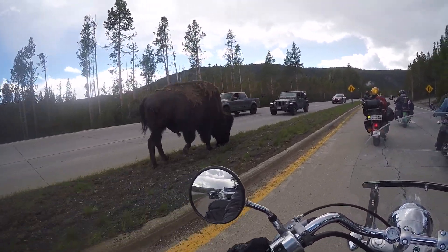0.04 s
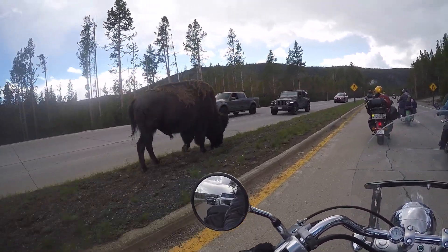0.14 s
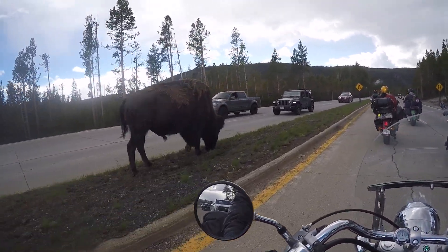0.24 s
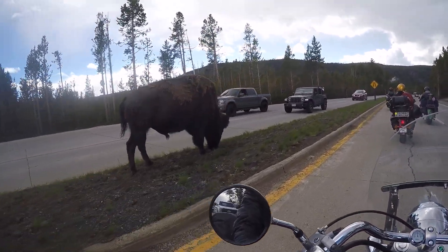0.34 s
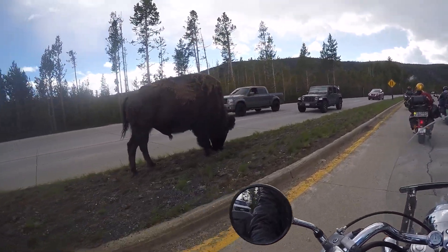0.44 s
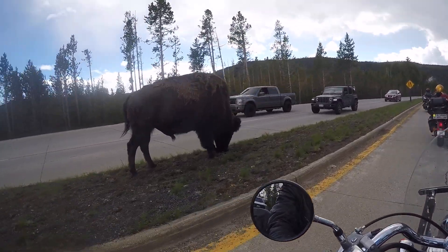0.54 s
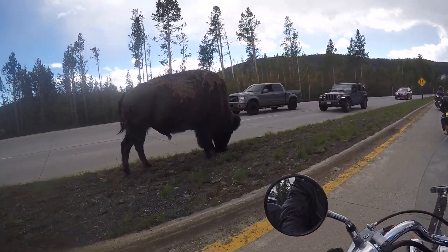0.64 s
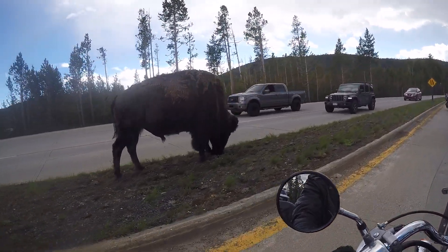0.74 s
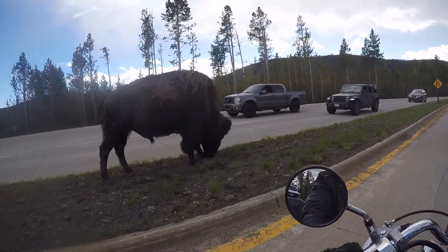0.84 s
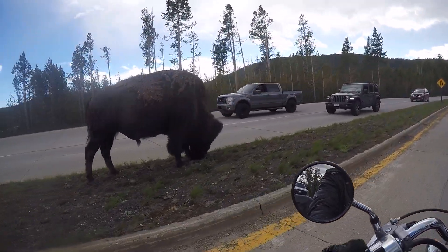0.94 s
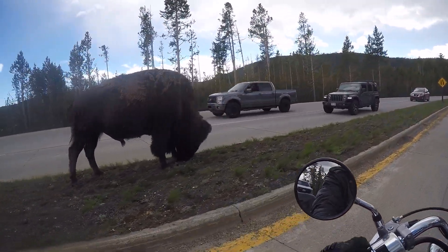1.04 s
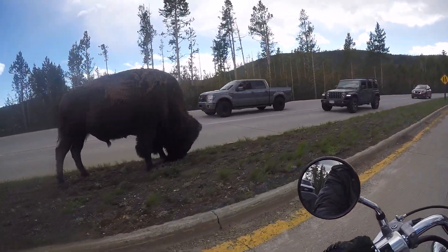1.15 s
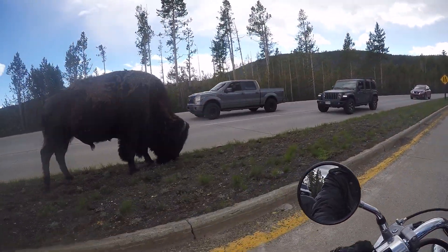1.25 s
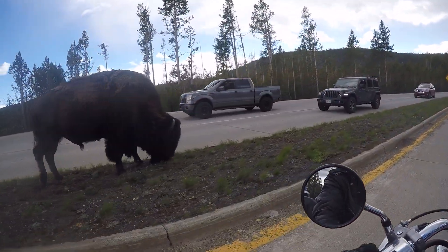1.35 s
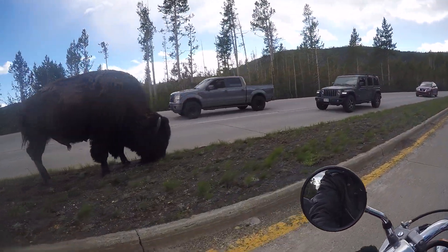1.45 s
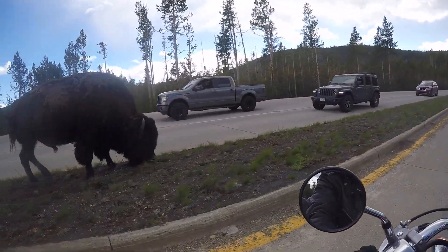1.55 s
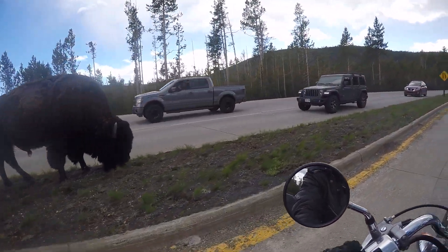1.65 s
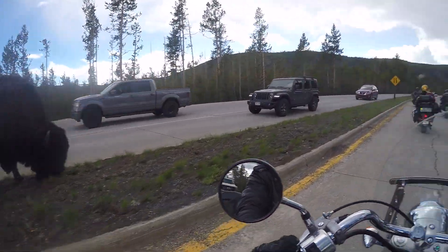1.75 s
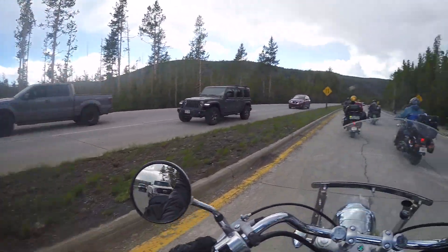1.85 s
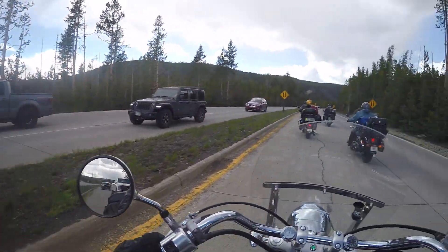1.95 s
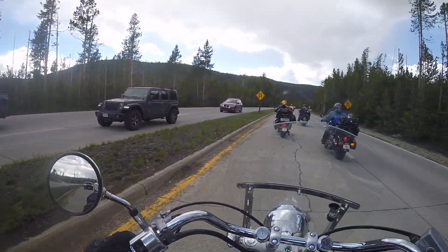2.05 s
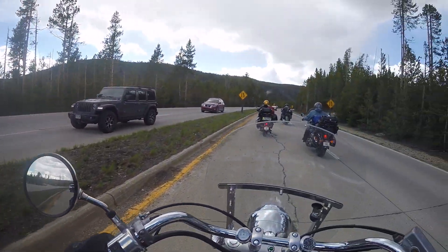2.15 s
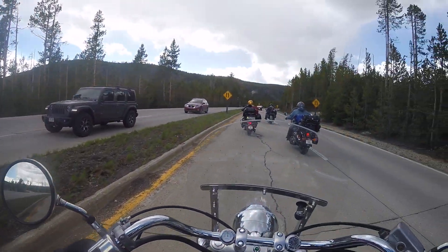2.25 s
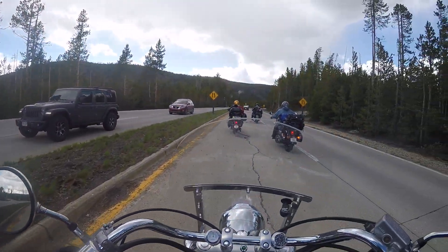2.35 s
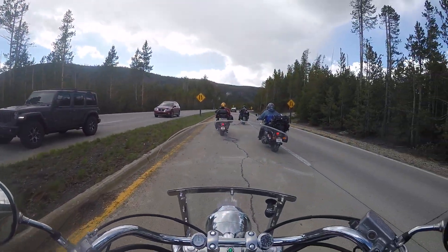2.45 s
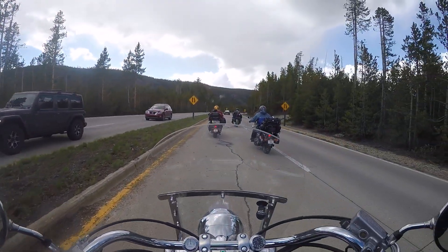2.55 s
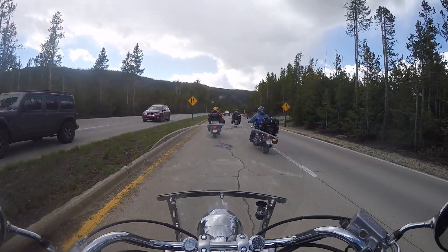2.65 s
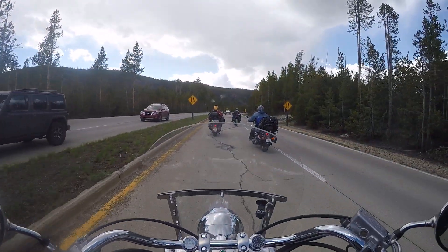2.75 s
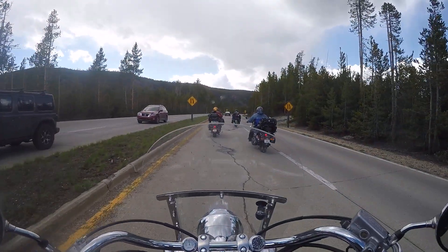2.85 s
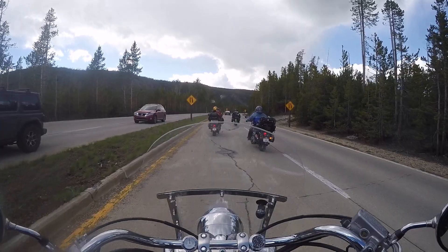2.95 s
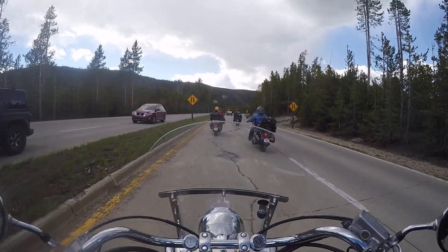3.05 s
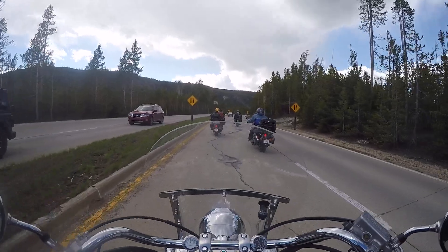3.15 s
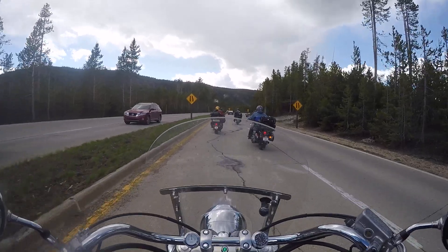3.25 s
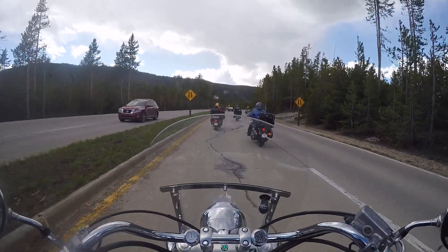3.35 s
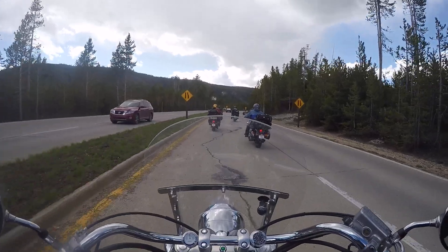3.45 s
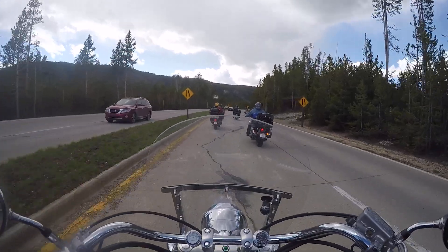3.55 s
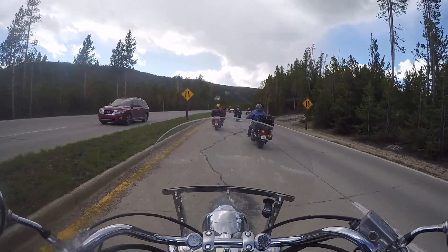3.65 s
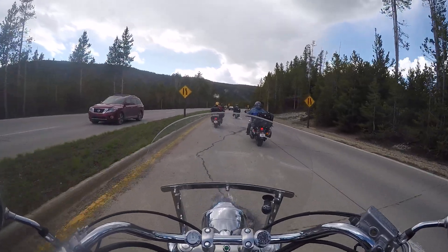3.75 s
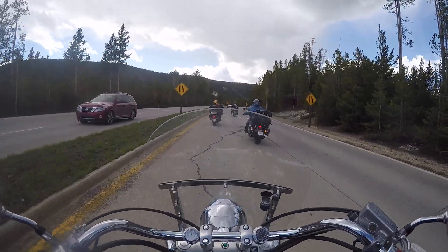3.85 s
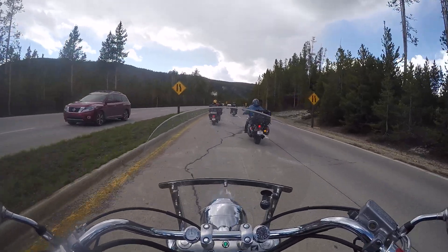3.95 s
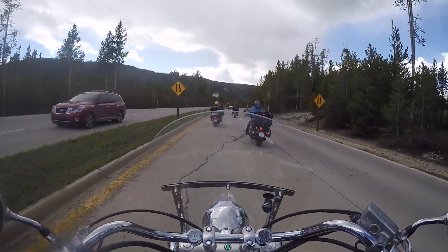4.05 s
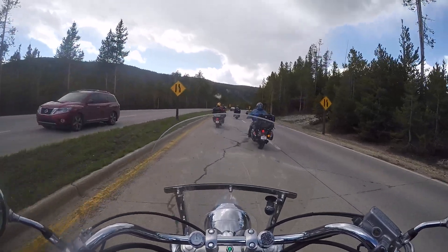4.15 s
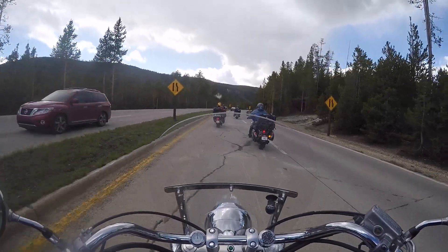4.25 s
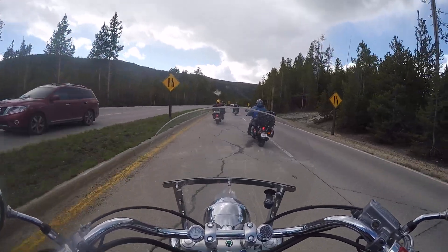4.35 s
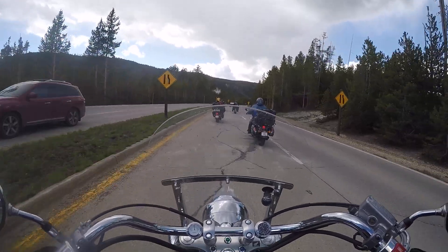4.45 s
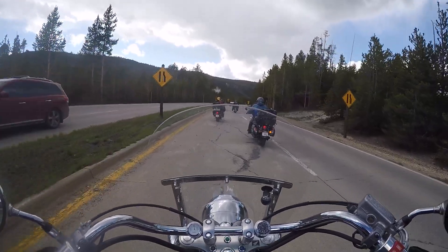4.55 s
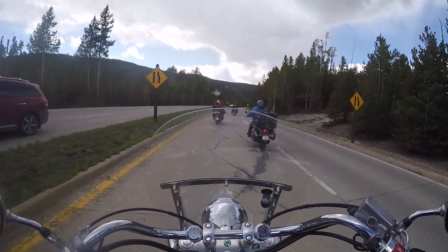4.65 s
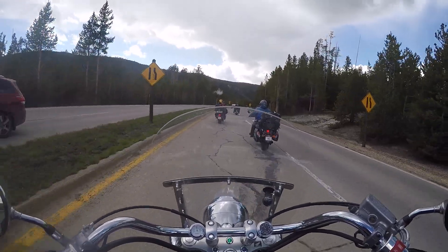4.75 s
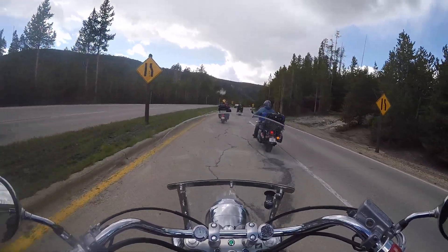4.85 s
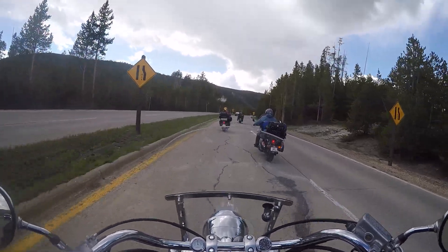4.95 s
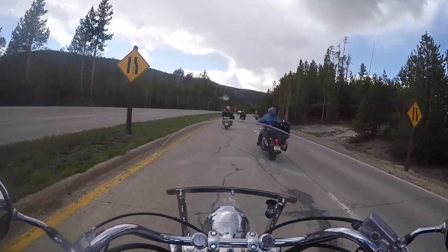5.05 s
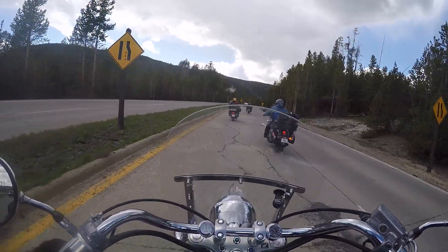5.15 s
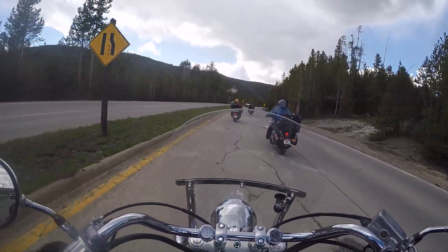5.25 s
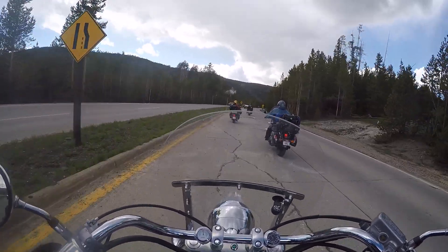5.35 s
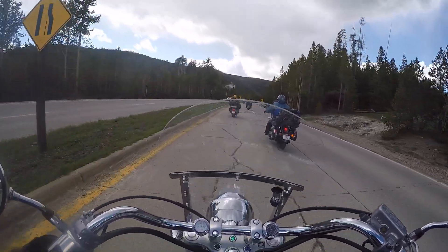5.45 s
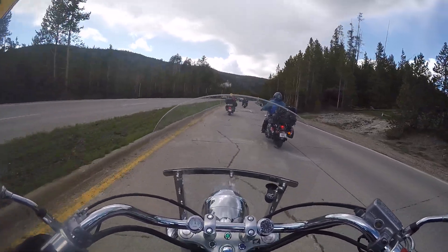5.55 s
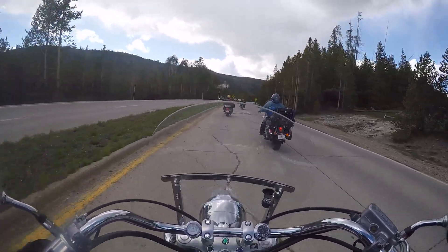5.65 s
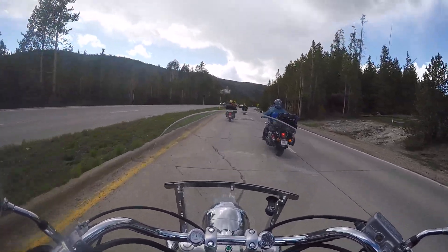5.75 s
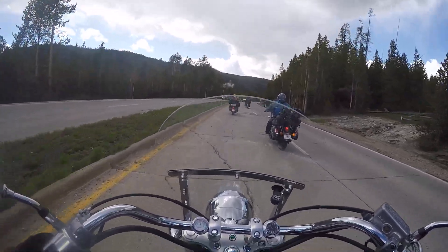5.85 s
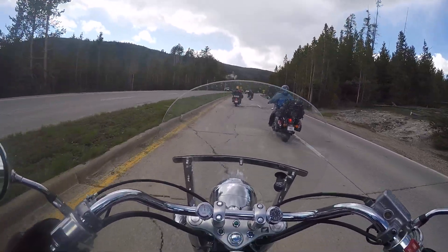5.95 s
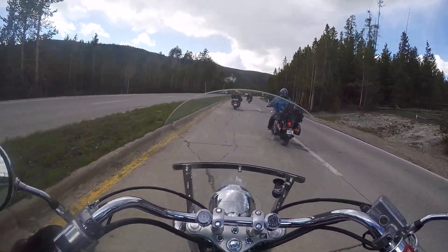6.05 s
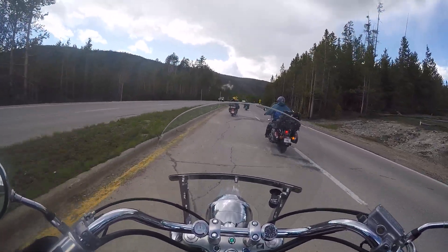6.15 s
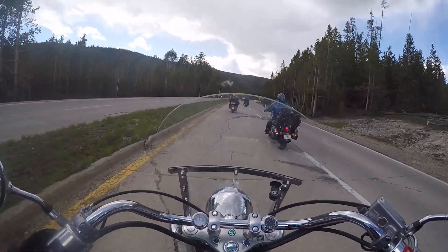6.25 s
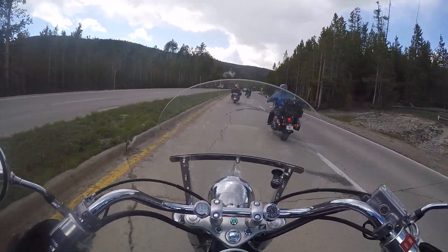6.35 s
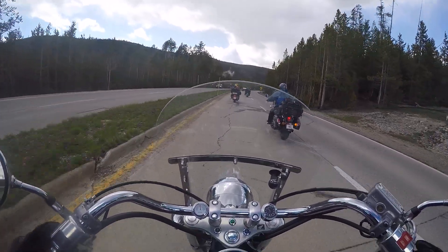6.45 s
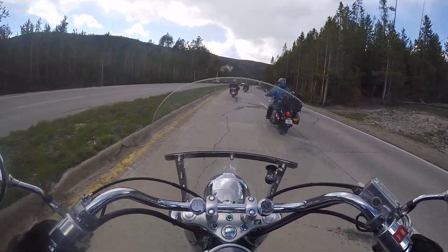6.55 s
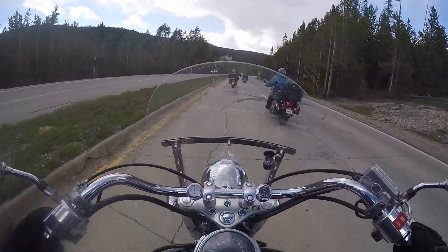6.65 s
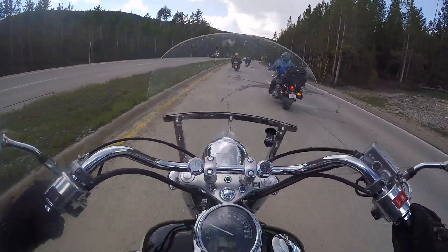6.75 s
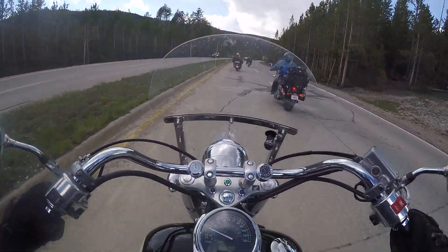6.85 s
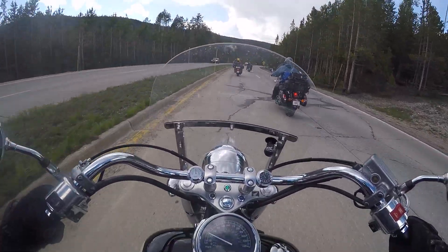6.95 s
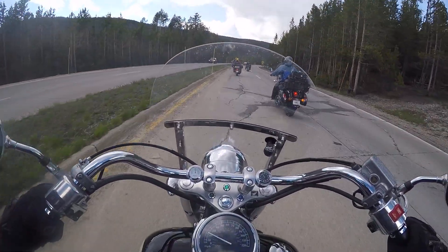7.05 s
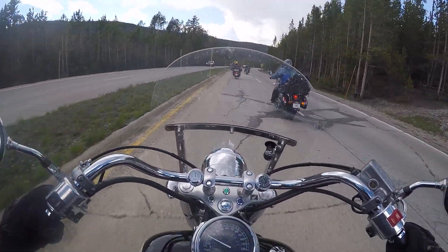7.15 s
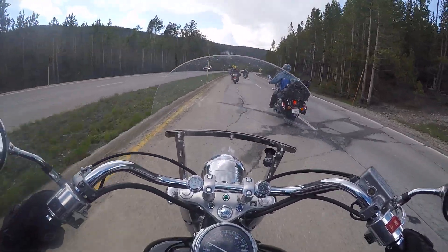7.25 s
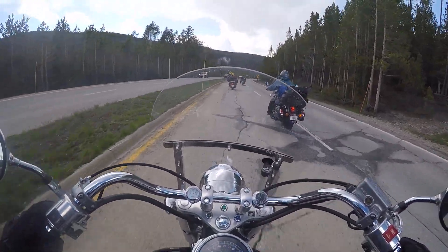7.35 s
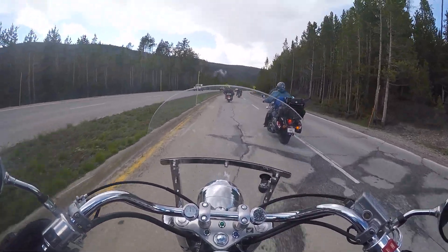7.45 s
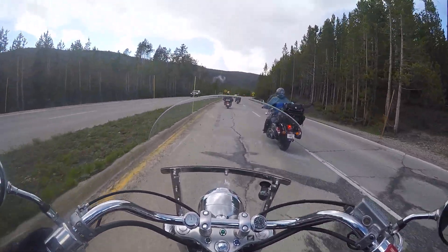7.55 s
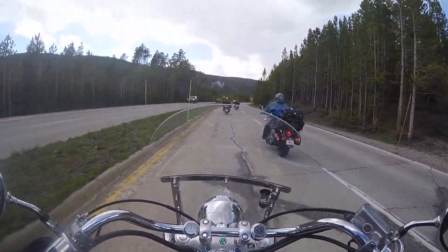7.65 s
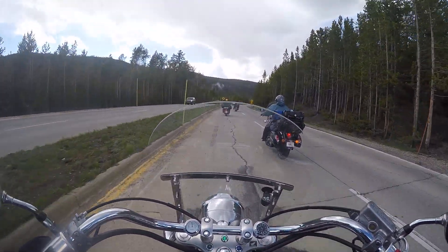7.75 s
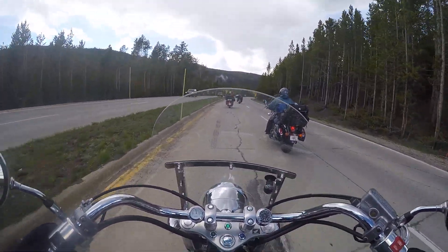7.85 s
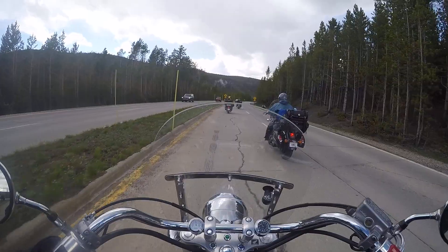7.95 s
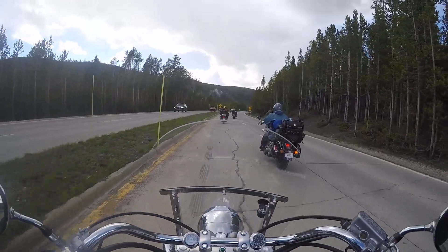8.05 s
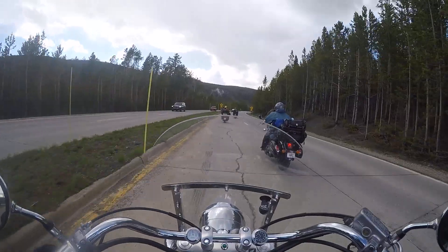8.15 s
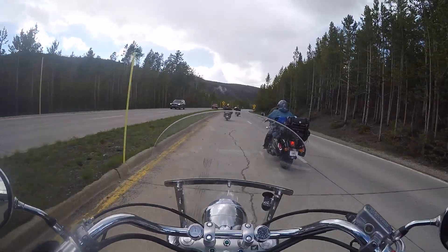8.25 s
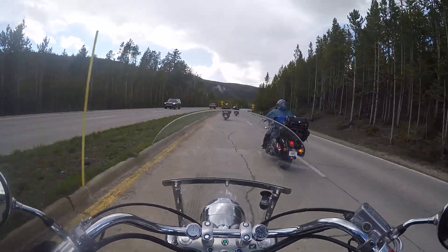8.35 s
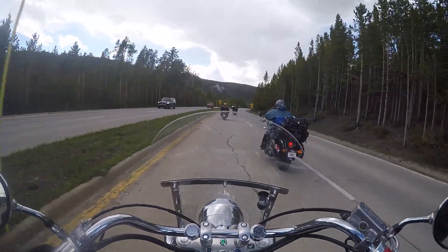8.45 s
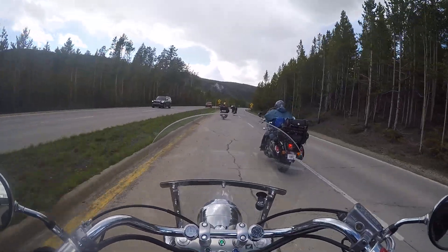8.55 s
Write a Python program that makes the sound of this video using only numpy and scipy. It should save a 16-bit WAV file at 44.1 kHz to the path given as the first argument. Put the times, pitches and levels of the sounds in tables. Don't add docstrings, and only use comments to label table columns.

```python
import sys
import numpy as np
from scipy import signal
from scipy.io import wavfile
from scipy.ndimage import uniform_filter1d

SR = 44100
rng = np.random.default_rng(int(sys.argv[2]) if len(sys.argv) > 2 else 0)


def dump_mix(stems):
    frames = np.atleast_2d(stems).T
    limited = np.clip(frames, -1, 1)
    pcm = np.round(limited * 32767).astype(np.int16)
    wavfile.write(sys.argv[1], SR, pcm)


def level_to_linear(level):
    exponent = np.asarray(level, float) / 20
    return 10 ** exponent


N = 379701

# time in seconds, four-stroke cycles per second.
RASPY_SPEED = [(0.0, 11.336), (1.0, 11.417), (2.0, 15.65), (2.25, 19.513), (2.75, 17.309), (3.0, 15.127),
               (3.25, 16.139), (4.0, 21.662), (4.87, 26.877), (5.1, 19.918), (5.25, 17.468), (5.75, 17.164),
               (8.61, 23.726)]
TICKING_SPEED = [
    (0.0, 11.042),
    (0.5, 10.279),
    (0.75, 10.649),
    (1.25, 12.398),
    (3.0, 16.733),
    (4.5, 22.165),
    (6.37, 29.568),
    (6.75, 19.89),
    (7.0, 19.062),
    (8.61, 22.275),
]
FAR_SPEED = [
    (0.0, 11.105),
    (1.2, 11.69),
    (1.5, 14.309),
    (1.8, 14.12),
    (2.1, 11.13),
    (2.25, 10.369),
    (4.5, 13.097),
    (4.9, 13.2),
    (5.7, 15.292),
    (8.61, 16.494),
]
# time in seconds, level in dB.
RASPY_LOAD = [(0, -52.5), (1.7, -39), (2.0, -39.5), (2.3, -33.5), (2.8, -26.5), (4.0, -25), (4.5, -28),
              (4.87, -28), (4.93, -43), (5.3, -47.5), (5.9, -28.5), (6.8, -26.5), (8.0, -28.5), (8.45, -29),
              (8.61, -37.5)]
TICKING_LOAD = [(0, -50), (1.0, -45.5), (1.5, -46), (2.6, -37), (4.4, -34.5), (5.2, -30.5), (5.7, -34.5),
                (6.38, -31), (6.42, -62), (6.8, -61), (6.95, -35), (7.75, -30), (8.61, -28)]
FAR_LOAD = [(0, -44), (1.15, -43.5), (1.251, -41), (1.5, -33.5), (1.68, -42), (1.8, -37.5), (2.2, -40),
            (2.6, -42), (4.5, -31.5), (4.9, -34.5), (6.098, -35), (8.61, -61)]
# time in seconds, tilt in dB per octave above 5 kHz.
RASPY_BRIGHT = [(0, -2), (4.9, -7), (5.9, 11), (8.61, -1)]
TICKING_BRIGHT = [(0, 2.5), (4.4, 1), (5.2, 2), (5.8, -0.5), (6.4, 8), (7.0, 8), (8.61, -1)]
FAR_BRIGHT = [(0, 0.1), (2.3, -.6), (4.7, -0.0044), (8.61, 0.1)]
# centre in Hz, width in Hz, first cylinder in dB, second cylinder in dB.
RASPY_PIPE = [(44.4, 12.4, -8, -14), (104.8, 37.5, -1, 2), (141.2, 38.6, -20.5, 0),
              (233.7, 25.6, -20, -7.5), (328, 67, -37, -34.5), (400.7, 31, -29.5, -24.5),
              (484, 63, -25.5, -22.5)]
TICKING_PIPE = [(114.3, 30, 7.5, 8), (144.4, 56, -5, -5.5), (241, 31, -5.5, -4), (273, 68, 0.5, 7),
                (413.4, 76, -4.5, -2), (529, 160, -10.5, -28), (726, 27, -24, -13), (907, 59, -12, -21.5)]
FAR_PIPE = [(61, 12, 3, 12), (98.8, 49, 12, 9.5), (150, 72, -27, -14), (213.4, 29.4, 0.5, 3),
            (262, 220, -24, -33), (368, 70, -23.5, -18)]
# centre in Hz, width in Hz, first cylinder in dB, second cylinder in dB.
RASPY_GAS = [(930, 300, -9, -12.5), (1364, 290, -6, -4.5), (1800, 410, 3, 4), (2334, 416, 9.5, 6.5),
             (2860, 680, 11, 3.5), (3695, 320, 2.5, -2), (4200, 3240, 4.5, 2.5), (7000, 1400, -40, -34),
             (9300, 4600, -20, -25), (12500, 4600, -60, -74)]
TICKING_GAS = [(954, 990, -6, -3), (1636, 490, -9, 0), (2520, 200, -3, 8.5), (4204, 1620, 10, 12),
               (5244, 740, 7, 10.5), (6200, 420, -6.5, -1), (8130, 600, -9, -1.5), (9000, 1500, -5.5, 2),
               (12450, 1400, -13, -6.5), (15200, 1600, -16, -9.5)]
FAR_GAS = [(1680, 760, -2.5, -5.5), (2490, 570, 7.5, 7), (3110, 650, -3, 4), (4440, 2100, 0.5, 0.5),
           (5700, 640, -23, -15), (8300, 970, -14, -14), (11500, 5400, -31, -14)]
# frequency in Hz, level in dB.
ROAR = [(45, -8), (100, 0), (170, -2), (250, -10), (350, -18), (500, -21), (620, -22)]
# frequency in Hz, level in dB per Hz.
HISS = [(740, -12), (1250, 1.5), (1670, 4.5), (2040, 1), (2500, 9.5), (3300, -4.5), (3870, -2),
        (5390, -9.5), (6000, -7), (8800, -26.5), (10600, -26), (14500, -22), (16000, -50)]
# time in seconds, peak in dB.
GUSTS = [(0.219, -31), (1.111, -32), (1.923, -12.5), (2.265, -20), (3.252, -20.5), (3.547, -6.5),
         (3.948, -17), (4.538, -25), (4.95, -7.5), (5.182, -15), (5.366, -15.5), (5.984, -31), (6.196, -26),
         (6.455, -8), (6.661, -20), (6.817, -9), (7.381, -7), (7.698, -8.5), (7.97, -18), (8.325, -23)]
# time in seconds, peak in dB.
IDLE_TICKS = [(0.162, -44), (0.2214, -46), (0.2823, -47), (0.307, -29), (0.3431, -45), (0.3681, -25.5),
              (0.4045, -46), (0.4666, -41), (0.5226, -28), (0.592, -29), (0.6963, -39), (0.7397, -34)]
# centre in Hz, width in Hz, depth as a share removed (negative lifts).
HOUSING = [
    (1190, 144, 0.51),
    (1715, 80, -1.38),
    (2250, 960, 0.3),
    (5950, 900, 0.42),
]


def rms_one(x):
    return x / np.sqrt(np.mean(x ** 2) + 1e-20)


def in_time(rows):
    seconds, *columns = np.transpose(rows)
    return [np.interp(np.arange(N) / SR, seconds, column) for column in columns]


def resonate(x, hz, width_hz):
    r = np.exp(-np.pi * width_hz / SR)
    top = np.array([1, 0, -1]) * (1 - r * r) / 2
    ring = [1, -2 * r * np.cos(2 * np.pi * hz / SR), r * r]
    return signal.lfilter(top, ring, x + 1e-18)


def resonate_twice(x, hz, width_hz):
    return resonate(resonate(x, hz, width_hz), hz, width_hz)


def smear(x, seconds):
    return signal.lfilter([1], [1, -np.exp(-1 / (max(seconds, 1e-5) * SR))], x + 1e-18)


def drift(rate):
    wander = smear(smear(rng.standard_normal(N + SR), 0.18 / rate), 0.18 / rate)
    return rms_one(wander[SR:])


def under_way(levels, middle_s=1.9, rise_s=0.29):
    pace = 1 / (1 + np.exp((middle_s - np.arange(N) / SR) / rise_s))
    return levels[0] + (levels[1] - levels[0]) * pace


def banded_noise(spectrum, patchy_db, count):
    hz, level_db = np.transpose(spectrum)
    edges = np.geomspace(hz[0], hz[-1], count + 1)
    white, flicker, out = rng.standard_normal((2, N)), drift(16.5), 0
    for k, (low, high) in enumerate(zip(edges, edges[1:])):
        band_pass = signal.butter(2, [low, high], "band", fs=SR, output="sos")
        band = signal.sosfilt(band_pass, white[k % 2])
        band_db = np.interp(np.log(low * high) / 2, np.log(hz), level_db)
        out = out + band * level_to_linear(band_db + patchy_db * np.roll(flicker, k * N // count))
    return rms_one(out)


def tyre_roar():
    roar = level_to_linear(under_way((-37.5, -29.5))) * banded_noise(ROAR, patchy_db=-4.0, count=8)
    return signal.sosfilt(signal.butter(6, 640, fs=SR, output="sos"), roar)


def air_hiss():
    throttle_share = 0.14
    hiss_db = under_way((-44.5, -35.5)) + throttle_share * (in_time(RASPY_LOAD)[0] + 30)
    hiss = level_to_linear(hiss_db) * banded_noise(HISS, patchy_db=2.5, count=16)
    return signal.sosfilt(signal.butter(3, 1000, "high", fs=SR, output="sos"), hiss)


def car():
    pass_s, span_s, peak_db = 2.74, 0.52, -44
    near = 1 / (1 + ((np.arange(N) / SR - pass_s) / span_s) ** 2)
    return level_to_linear(peak_db) * near * rms_one(resonate_twice(rng.standard_normal(N), 920, 450))


def buffet_level():
    delay_s, width_s, trim_db = 0.041, 0.056, -5.5
    t = np.arange(N) / SR
    steady_db = under_way((-33, -19.5), middle_s=4.3, rise_s=0.9)
    swells = np.zeros(N)
    for hit_s, peak_db in GUSTS:
        swells += level_to_linear(peak_db + trim_db) * np.exp(-0.5 * ((t - hit_s - delay_s) / width_s) ** 2)
    return 20 * np.log10(level_to_linear(steady_db) + swells)


def wind(buffet_db):
    lumps = rng.standard_normal(N) * level_to_linear(0.18 * drift(7.5))
    swing = rms_one(resonate(resonate(lumps, 20.3, 8.1), 23.5, 13.0))
    flutter = rms_one(resonate_twice(lumps, 43, 72))
    return level_to_linear(buffet_db - 6) * rms_one(swing + level_to_linear(-9.0) * flutter)


def valve_ticks():
    patter_per_s, patter_db, spread_db = 64, -33.5, 4.7
    clicks = (rng.random(N) < patter_per_s / SR) * level_to_linear(patter_db + spread_db * rng.standard_normal(N))
    for tick_s, peak_db in IDLE_TICKS:
        clicks[round(tick_s * SR)] = level_to_linear(peak_db + 3.0)
    puffs = smear(clicks, 0.00097) * rng.standard_normal(N)
    return resonate(puffs, 8800, 730) + level_to_linear(-4.0) * resonate(np.roll(puffs, SR // 9), 7600, 700)


def thump_level(speed, load, open_db, throttle_share, db_per_octave):
    return open_db + throttle_share * (in_time(load)[0] + 30) + db_per_octave * np.log2(in_time(speed)[0] / 20)


def intake(speed, thump_db):
    db_per_gain = 3
    gain = uniform_filter1d(np.clip(np.gradient(in_time(speed)[0]) * SR, 1, 5), size=SR // 8)
    air = rng.standard_normal(N)
    box = resonate_twice(air, 890, 330)
    box = box + level_to_linear(-8.5) * resonate_twice(air, 1065, 150)
    box = box + level_to_linear(-2.5) * resonate_twice(air, 755, 99)
    return level_to_linear(1.17 * (thump_db + 31) - 40.5 + db_per_gain * (gain - 4.5)) * rms_one(box)


def firings(speed, start, gap):
    cycles = start + np.cumsum(in_time(speed)[0]) / SR
    at = [np.nonzero(np.diff(np.floor(cycles - lag)))[0] for lag in (0, gap)]
    return np.concatenate(at), np.repeat([0, 1], [len(a) for a in at])


def uneven(count, spread_db):
    return spread_db * np.clip(rng.standard_normal(count), -2, 1.5)


def pipe_thump(at, cylinder, speed, pipe, push, strength_db):
    bark_above_hz, bark_db_per_halving = 380, 5
    bark_db = bark_db_per_halving * np.log2(25 / in_time(speed)[0][at]) * under_way((0, 1), 1.3, 0.16)[at]
    thump = np.zeros(N)
    for hz, width_hz, *cylinder_db in pipe:
        kick_db = np.array(cylinder_db)[cylinder] + strength_db / 3 + bark_db * (hz > bark_above_hz)
        clicks = np.zeros(N)
        clicks[at] = level_to_linear(kick_db + rng.standard_normal(len(at)))
        thump += push * resonate_twice(clicks, hz, width_hz)
    return rms_one(thump)


def gas_burst(at, cylinder, bright, gas, strength_db, rise_s, fall_s, echo_s, echo_db, grit, uneven_db):
    turbulence = rng.standard_normal(N) * np.exp(grit * np.clip(drift(285), -2, 1.3))
    slope_db = in_time(bright)[0][at]
    burst = np.zeros(N)
    for k, (hz, width_hz, *cylinder_db) in enumerate(gas):
        puff_db = np.array(cylinder_db)[cylinder] + slope_db * max(np.log2(hz / 5000), 0)
        clicks = np.zeros(N)
        clicks[at] = level_to_linear(puff_db + 0.43 * strength_db + uneven(len(at), uneven_db))
        clicks += level_to_linear(echo_db) * np.roll(clicks, round(echo_s * SR))
        gate = smear(smear(clicks, rise_s), fall_s * (2500 / hz) ** 0.41)
        jet = gate * np.roll(turbulence, k // 3 * SR)
        burst += resonate_twice(jet, hz, width_hz) / np.sqrt(width_hz)
    return rms_one(burst)


def twin(speed, start, gap, load, thump_db, bright, pipe, gas, push, uneven_db, **burst_shape):
    at, cylinder = firings(speed, start, gap)
    strength_db = uneven(len(at), uneven_db)
    thump = pipe_thump(at, cylinder, speed, pipe, push, strength_db)
    burst = gas_burst(at, cylinder, bright, gas, strength_db, uneven_db=uneven_db, **burst_shape)
    return level_to_linear(thump_db) * thump + level_to_linear(in_time(load)[0]) * burst


def far_bike():
    thump_db = thump_level(FAR_SPEED, FAR_LOAD, open_db=-41.5, throttle_share=0.4, db_per_octave=-17.5)
    return twin(FAR_SPEED, 0.405, 0.275, FAR_LOAD, thump_db, FAR_BRIGHT, FAR_PIPE, FAR_GAS, push=1,
                rise_s=0.0005, fall_s=0.004, echo_s=0.009, echo_db=-12, grit=0.3, uneven_db=3)


def ticking_bike():
    thump_db = thump_level(TICKING_SPEED, TICKING_LOAD, open_db=-32, throttle_share=0.32, db_per_octave=11.4)
    exhaust = twin(TICKING_SPEED, 0.6, 0.4, TICKING_LOAD, thump_db, TICKING_BRIGHT, TICKING_PIPE, TICKING_GAS,
                   push=1, rise_s=0.0005, fall_s=0.0034, echo_s=0.006, echo_db=-14, grit=0.35, uneven_db=3)
    return exhaust + intake(TICKING_SPEED, thump_db)


def raspy_bike():
    thump_db = thump_level(RASPY_SPEED, RASPY_LOAD, open_db=-25.5, throttle_share=0.48, db_per_octave=7.2)
    return twin(RASPY_SPEED, 0.54, 0.42, RASPY_LOAD, thump_db, RASPY_BRIGHT, RASPY_PIPE, RASPY_GAS, push=-1,
                rise_s=0.0012, fall_s=0.0078, echo_s=0.004, echo_db=-18, grit=0.26, uneven_db=2.5)


def scene():
    background = tyre_roar() + air_hiss() + car() + wind(buffet_level())
    bikes = valve_ticks() + far_bike() + ticking_bike() + raspy_bike()
    return (background + bikes)[None]


def roll_off(x):
    return signal.sosfilt(signal.butter(12, 16170, fs=SR, output="sos"), x)


def record(dry):
    for hz, width_hz, depth in HOUSING:
        dry = dry - np.clip(depth, -1.5, 1) * resonate(dry, hz, width_hz)
    rounded = 1.485 * np.tanh(dry / 1.117)
    mix = signal.sosfilt(signal.cheby2(12, 60, 16100, fs=SR, output="sos"), rounded)
    return roll_off(mix)


dry = scene()
out = record(dry)
dump_mix(out)
```